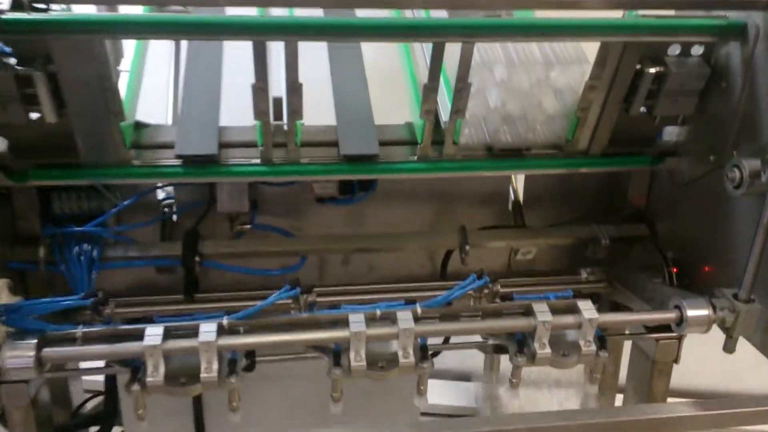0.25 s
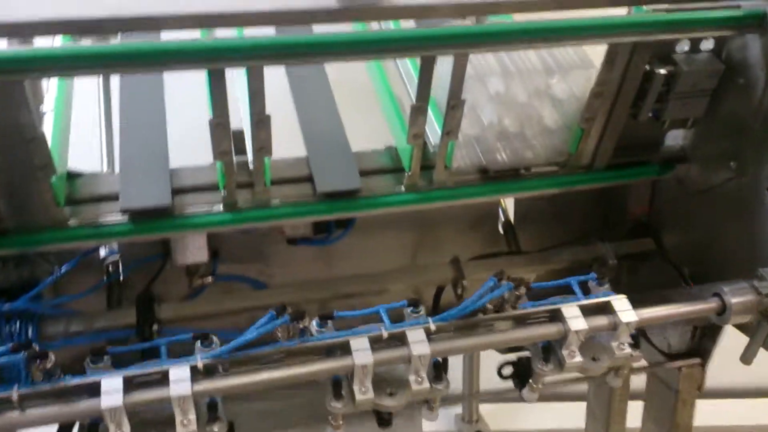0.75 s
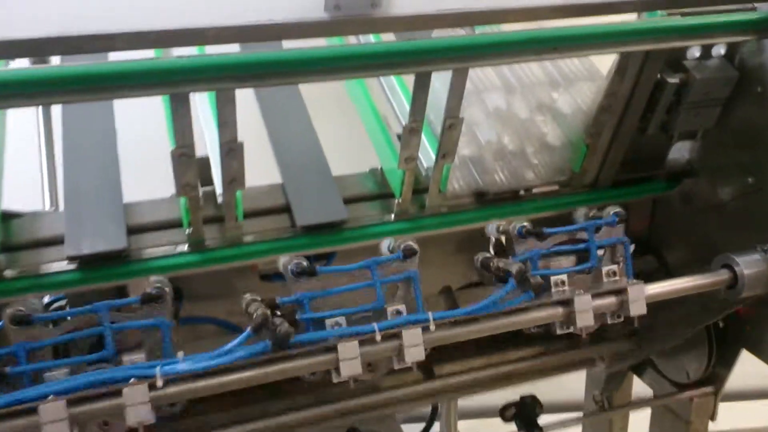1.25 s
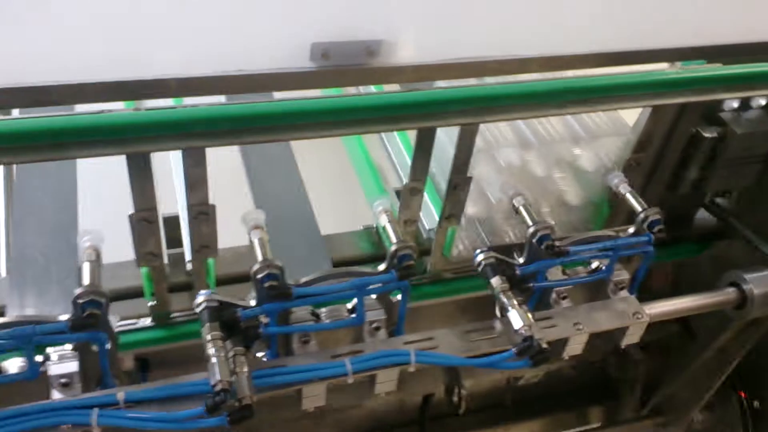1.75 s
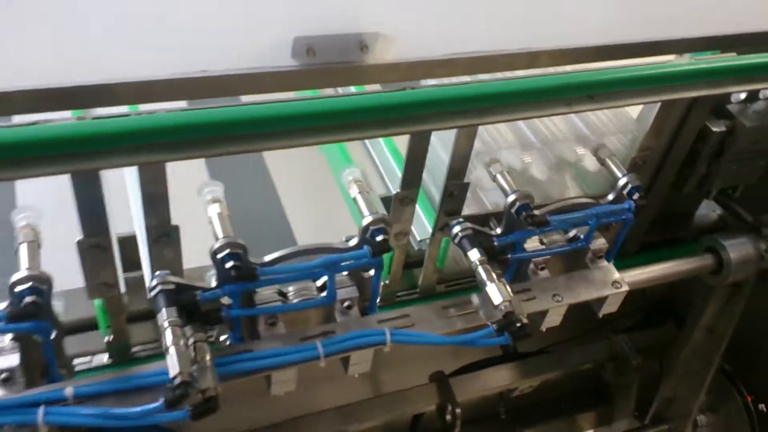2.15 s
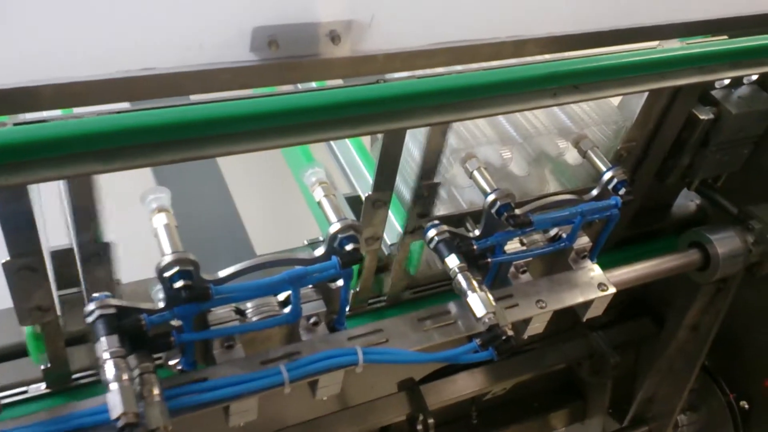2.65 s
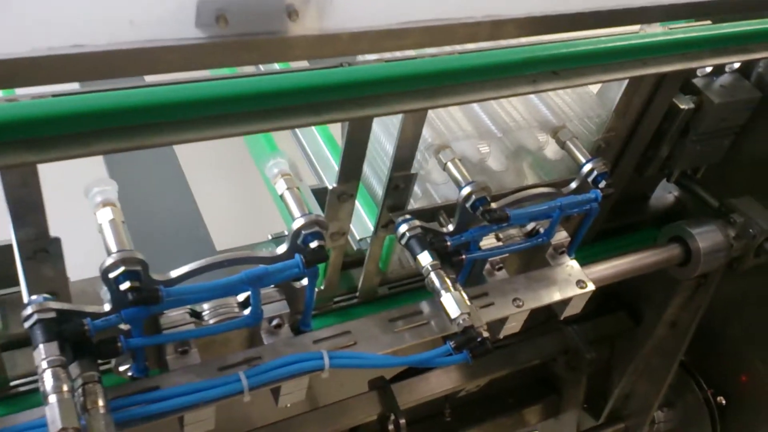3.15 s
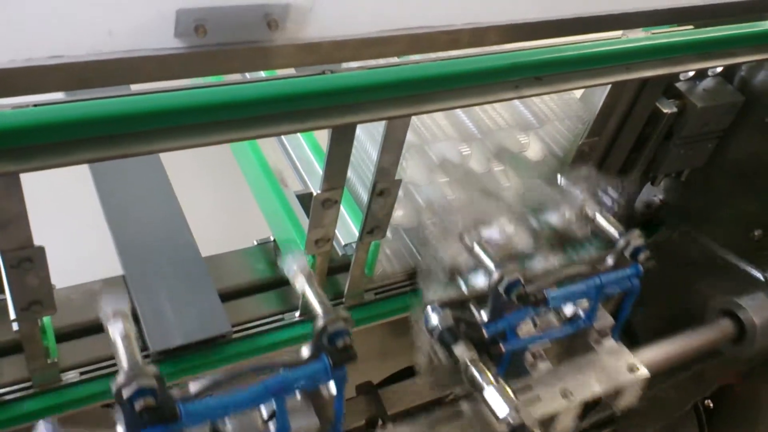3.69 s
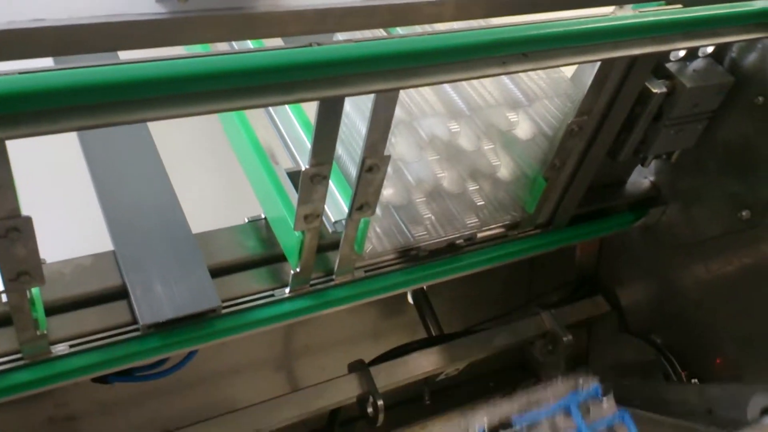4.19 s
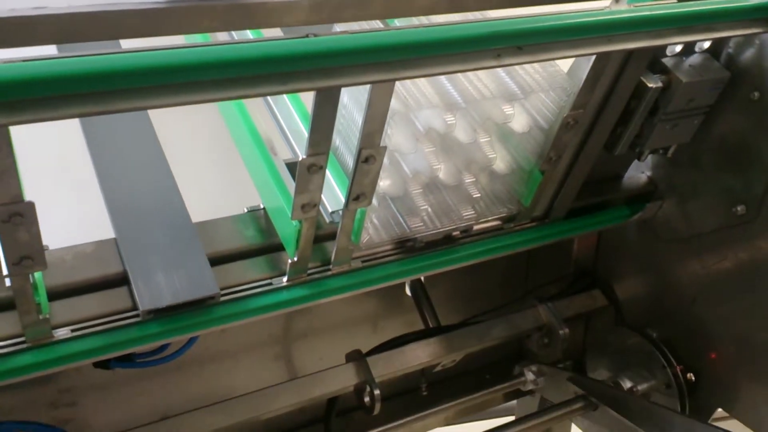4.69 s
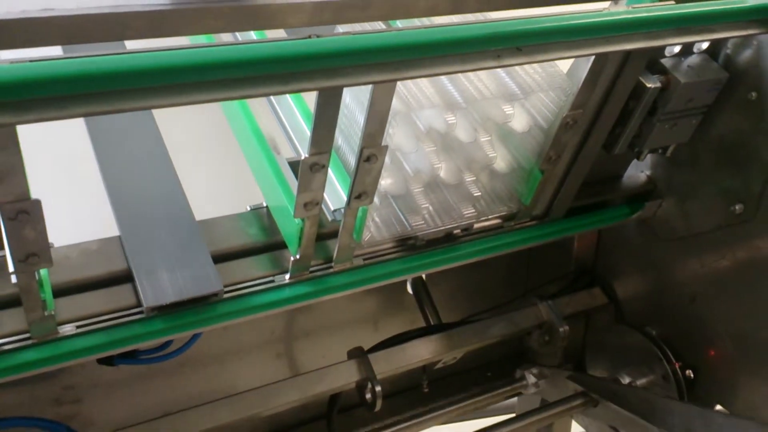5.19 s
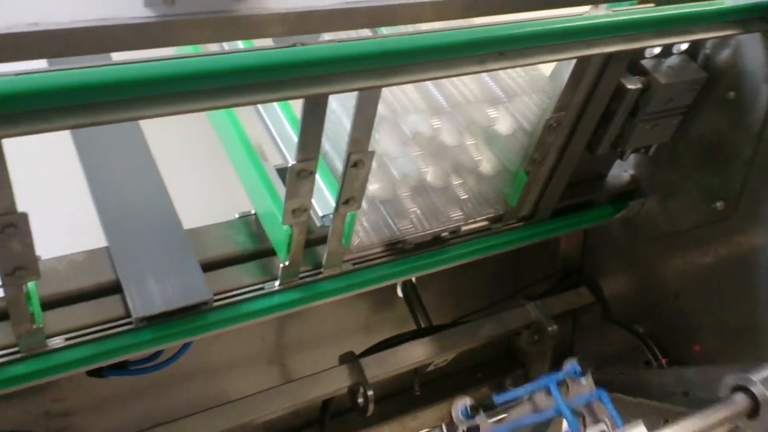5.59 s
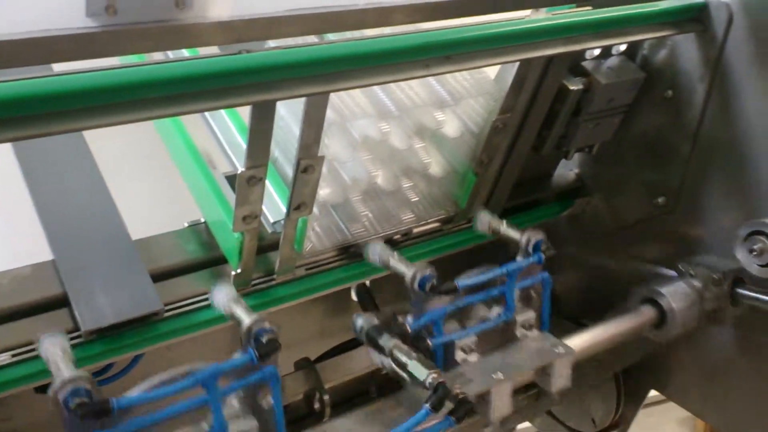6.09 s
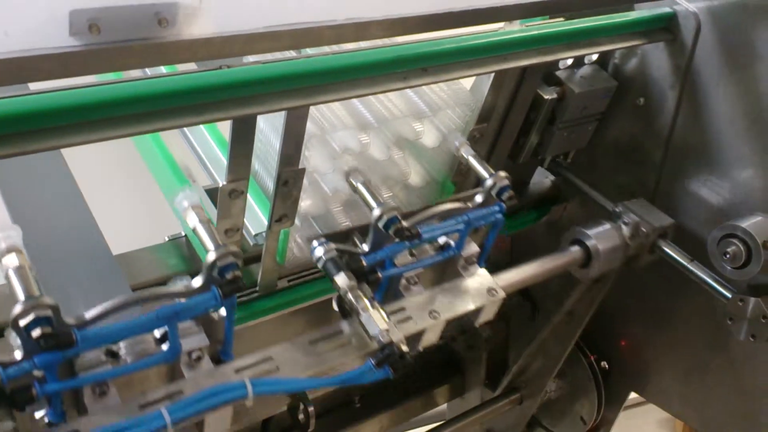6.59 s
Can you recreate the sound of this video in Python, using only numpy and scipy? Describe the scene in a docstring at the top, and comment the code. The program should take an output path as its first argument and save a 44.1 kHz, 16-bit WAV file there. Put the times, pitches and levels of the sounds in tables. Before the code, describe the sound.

A pneumatic arm in a steel machine housing knocks and hisses, with one violent air blast mid-way, long vacuum hiss, then clacks and bright valve ticks.

```python
"""A pneumatic pick-and-place arm works inside the steel housing of a packaging machine.
Turbulent air, as coloured noise, hisses from vacuum ejectors while suction cups hold and puffs from valves.
Noise bursts and decaying modes sound as the arm knocks on its stops, padded blows land and small parts tick.
Echoes of the housing and workshop follow these sounds, over a drive hum, churning gear and a low rumble."""
import sys
import numpy as np
from scipy import signal
from scipy.fft import rfft, irfft, next_fast_len
from scipy.io import wavfile
from scipy.ndimage import uniform_filter1d

SR = 44100
rng = np.random.default_rng(int(sys.argv[2]) if len(sys.argv) > 2 else 0)


def to_wav(s):
    """Save 16-bit WAV."""
    ch = np.atleast_2d(s).T  # columns
    pcm = np.round(np.clip(ch, -1, 1) * 32767)  # PCM
    wavfile.write(sys.argv[1], SR, pcm.astype(np.int16))


N = 301644
TIME = np.arange(N) / SR  # clock of the scene [s]
AGE = TIME[:SR]  # clock of one event, one second long [s]

# spells of suction: (valve opens [s], valve shuts [s], level [dB])
SUCTION_SPELLS = [(-.1, 0.251, -27.5), (2.69, 4.958, -22.5)]
# valve exhausts: (time [s], level [dB], rise [s], t60 [s], low rush [dB])
EXHAUSTS = [(.773, -26, 0.012, 0.43, 0.5), (1.328, -40, 0.013, 0.38, -1), (2.074, -41, 0.022, 0.26, -13),
            (2.674, -4.5, 0.012, 0.17, -16), (2.829, -19, 0.024, 0.1, -2.5),
            (2.973, -14, 0.0043, 0.3, -7.5), (3.078, -11, 0.0019, 0.12, -35),
            (3.419, -25.5, 0.049, 0.18, -4.5), (5.12, -31, 0.0041, 0.34, 5.5),
            (5.225, -40, 0.029, 0.2, 2.5), (5.484, -26.5, 0.0011, 0.17, 4),
            (5.762, -43.5, 0.0027, 0.38, -3), (6.118, -34, 0.0015, 0.44, -1),
            (6.326, -36, 0.0035, 0.26, -3.5), (6.397, -31, 0.0033, 0.21, -2)]
# spectrum of clattering linkages: (frequency [Hz], level [dB])
CLATTER_SPECTRUM = [(150, -36), (400, -20.5), (750, -3.5), (1050, -1), (1400, 0), (1750, -9), (2300, 0),
                    (3300, -7), (6000, -12.5)]
# spectrum of small valves and catches: (frequency [Hz], level [dB])
TICK_SPECTRUM = [(700, -6), (1500, -1.5), (2500, -2), (4300, 11), (7400, 4.5), (10000, 4), (12000, -11),
                 (15500, -5.5)]
# blows that excite the frame: (time [s], level [dB])
FRAME_IMPACTS = [(2.68, -46.5), (2.772, -38.5), (2.843, -33.5), (2.981, -34.5), (3.092, -32)]
# spectrum of the churning gear: (frequency [Hz], level [dB])
CHURN_SPECTRUM = [(140, -2.5), (200, 2), (300, -3), (480, -3.5), (700, -2.5), (1200, -10), (2300, -19.5),
                  (3200, -29)]


def undb(db):
    """Level to amplitude: 20 dB is a factor of ten."""
    return 10 ** (np.asarray(db) / 20)


def unit(x):
    """Normalise mean power: scale to rms 1."""
    return x / np.sqrt(np.mean(x ** 2))


def curve(rows):
    """Linear interpolation in time of each column after the first."""
    s, *columns = np.transpose(rows)
    return [np.interp(TIME, s, c) for c in columns]


def filtered(x, gain_at):
    """Linear filtering: multiply the spectrum by a gain that depends on frequency."""
    size = x.shape[-1]
    length = next_fast_len(size, True)
    f = np.maximum(np.fft.rfftfreq(length, 1 / SR), 1)
    return irfft(rfft(x, length) * gain_at(f), length)[..., :size]


def noise(spectrum, size=N):
    """Coloured Gaussian noise of rms 1, whose spectrum falls away past the ends of its table."""
    hz, db = np.transpose(spectrum)

    def colour(f):
        shape = undb(np.interp(np.log(f), np.log(hz), db))
        return shape / (1 + (hz[0] / f) ** 2 / 2) / (1 + (f / hz[-1] / 2) ** 4)

    return unit(filtered(rng.standard_normal(size), colour))


def resonate(x, hz, q):
    """Second-order resonance: a band of relative width 1/q, scaled to rms 1."""
    return unit(filtered(x, lambda f: 1 / (1 + 1j * q * (f / hz - hz / f))))


def fade(t60, rise):
    """Exponential decay: after a linear rise, amplitude falls 60 dB in t60 seconds."""
    return np.minimum(AGE / rise, 1) * np.exp(-np.log(1000) * np.maximum(AGE - rise, 0) / t60)


def swell(length):
    """Half-sine envelope: a smooth rise and fall."""
    return np.sin(np.pi * np.minimum(AGE / length, 1))


def ring(modes, detune):
    """Modal superposition: each blow lands on another spot and shares its force a little differently."""
    hz, db, t60 = np.transpose(modes)[:, :, None]
    spot, drift, phase = rng.standard_normal((len(modes), 3)).T[:, :, None]
    size = undb(db + spot)
    decay = np.exp(-np.log(1000) * AGE / t60)
    waves = np.sin(2 * np.pi * (hz * (1 + detune * drift) * AGE + phase)) * decay
    return (size * waves).sum(0) / np.sqrt(np.sum(size ** 2) / 2)


def walk(rate):
    """Slow random fluctuation: Gaussian knots at a rate [1/s], joined by straight lines."""
    knots = rng.standard_normal(int(N / SR * rate) + 2)
    return np.interp(TIME * rate, np.arange(len(knots)), knots)


def mix(events):
    """Linear superposition of (start [s], sound) pairs on one track."""
    out = np.zeros(N)
    for s, x in events:
        i = max(int(s * SR), 0)
        out[i:i + len(x)] += x[:N - i]
    return out


def together(*gains):
    """Incoherent addition: unrelated sounds add in power."""
    return np.sqrt(sum(g ** 2 for g in gains))


def aftermath(events, gain_db, t60, rise=.015):
    """Energy decay: a level rises quickly at each (time [s], level [dB]) event, then dies away."""
    return np.sqrt(mix((s, (fade(t60, rise) * undb(db + gain_db)) ** 2) for s, db in events))


def ejectors(flutter_db=1.1, drift_db=-0.63, open_s=.024, shut_s=0.0011, gain_db=-1):
    """Jet turbulence: venturi ejectors hiss for as long as the suction valve is open."""
    # spectrum of the jets: (frequency [Hz], level [dB])
    jet_spectrum = [(400, -19.5), (750, -29), (1100, -17), (1400, -10.5), (1750, -17), (2250, -8.5),
                    (3700, -7.5), (5300, -6.5), (6400, -0.5), (7800, -0.5), (8600, -3.5), (9900, -1),
                    (12000, -8), (15500, -11)]
    flow = 0
    for opens, shuts, db in SUCTION_SPELLS:
        opening = np.clip((TIME - opens) / open_s, 0, 1)
        closing = np.clip((shuts - TIME) / shut_s, 0, 1)
        flow = flow + opening * closing * undb(db)
    # the hiss sinks a little while the arm swings down
    dip_s, dip_width_s, depth_db = 3.95, 0.75, -1.84
    dip_db = depth_db * np.exp(-((TIME - dip_s) / dip_width_s) ** 2)
    flutter = flutter_db * (walk(90) + walk(25))
    return flow * noise(jet_spectrum) * undb(gain_db + dip_db + flutter + drift_db * walk(4.2))


def exhaust(db, rise, t60, rush_db, top_hz=19000, dulling=0.24):
    """Pressure discharge: a cylinder dumps air as a bright jet over a low rush; weak jets are duller."""
    # spectrum of the jet: (frequency [Hz], level [dB])
    puff_spectrum = [(1500, -6), (2200, -6.5), (3400, -2.5), (4200, -4.5), (5500, -3.5), (7800, 0),
                     (10200, -1.5), (12000, -10), (15500, -15.5)]
    # spectrum of the lower rush: (frequency [Hz], level [dB])
    rush_spectrum = [(250, -19.5), (650, -8.5), (1200, -5), (1750, -3.5), (2400, -1.5), (3500, -8.5),
                     (6000, -12), (13000, -42.5)]
    edge_hz = top_hz * undb(dulling * db)
    jet = filtered(noise(puff_spectrum, size=SR), lambda f: 1 / np.hypot(1, (f / edge_hz) ** 3))
    pressure = fade(t60, rise)
    # the piston pushes the last air out after every exhaust
    trail = undb(-20.5) * fade(t60=.3, rise=0.14)
    rush = undb(rush_db) * noise(rush_spectrum, size=SR) * np.hypot(pressure, trail)
    return (jet * pressure + rush) * undb(db)


def rod_slides():
    """Sliding friction: piston rods rub in their seals, heard as swelling noise."""
    # strokes of the rods: (time [s], level [dB], length [s])
    rod_strokes = [(0.37, -56.5, 0.19), (2.087, -58.5, 0.26), (2.252, -49, 0.043)]
    # spectrum of the friction: (frequency [Hz], level [dB])
    friction_spectrum = [(1200, -8), (2100, 5), (2700, 4), (3600, -11), (8000, -24)]
    return mix((s, noise(friction_spectrum, size=SR) * swell(length) * undb(db))
               for s, db, length in rod_strokes)


def cavity(x):
    """Cavity resonance: the hollow of the housing lifts or weakens narrow bands of the air noise."""
    # resonances of the hollow: (frequency [Hz], gain of each alone [dB])
    hollow_modes = [(1041, 3.5), (1431, 7.5), (1568, 1), (2419, -0.5), (2509, -3), (3694, 3.5), (4001, 3),
                    (4849, -9.5), (5638, 7), (6773, 2.5), (6953, -5.5), (7573, 8), (10034, 2), (10645, 6)]
    width_hz = 24

    def gain(f):
        return 1 + sum((undb(db) - 1) / (1 + 2j * (f - hz) / width_hz) for hz, db in hollow_modes)

    return filtered(x, gain)


def air_outlets(count=3):
    """Incoherent sources: several outlets blow together, each with its own turbulence and echoes."""
    out = 0
    for _ in range(count):
        puffs = mix((s, exhaust(*row)) for s, *row in EXHAUSTS)
        air = puffs + rod_slides() + ejectors()
        out = out + housing(air, direct_db=-6.0, wet_db=-1, early_db=1.0, lead_s=.00042)
    return cavity(out) / np.sqrt(count)


def knock(db, treble_db, t60, hz, q=4, body_db=-1, clatter_db=-5, ring_db=-15.5, snap_t60=.027):
    """Impact excitation: a sharp snap, a clatter of linkages round one resonance and a short steel ring."""
    # modes of the steel: (frequency [Hz], level [dB], t60 [s])
    steel_modes = [(1070, -4.5, 0.079), (1302, -5.5, 0.23), (1555, -1, .12), (1880, -5, .13),
                   (2010, -5.5, 0.15), (2490, -13, .12), (2980, -12, .13), (4000, -9, 0.12),
                   (5130, -24, .1)]
    # spectrum of the first snap: (frequency [Hz], level [dB])
    snap_spectrum = [(2000, -23.5), (4000, 6), (7500, 5), (10000, -1), (15000, -18.5)]
    snap = noise(snap_spectrum, size=SR) * fade(snap_t60, 0.0016) * undb(treble_db)
    blow = fade(t60, 0.00068)
    clatter = noise(CLATTER_SPECTRUM, size=SR) * blow
    body = resonate(clatter, hz, q) * np.std(blow)  # lasting ring, weighted by the blow's spread
    steel = ring(steel_modes, detune=0.0073)
    mixed = snap + undb(clatter_db) * clatter + undb(body_db) * body + undb(ring_db) * steel
    return mixed * undb(db)


def stop_knocks():
    """Inelastic rebound: the arm meets a stop, then bounces once with less energy."""
    # steel on steel: (time [s], level [dB], treble [dB], clatter t60 [s], strongest resonance [Hz])
    stop_impacts = [(.229, -24, 0, 0.043, 2250), (0.772, -24.5, -10, 0.025, 1300),
                    (.790, -19, 6.5, 0.06, 1416), (.899, -21.5, 0.5, 0.027, 1400),
                    (1.036, -41.5, -22, 0.044, 2600), (2.144, -38.5, -17.5, 0.018, 1200),
                    (2.299, -31, -16.5, 0.0097, 1950), (2.678, -6.5, -12.5, 0.034, 1527),
                    (2.985, -21, -11, 0.059, 1443), (3.080, -10.5, 4.5, 0.065, 2400),
                    (4.95, -19.5, 0, 0.022, 1480), (5.127, -17, 0.5, 0.099, 1028),
                    (5.496, -14.5, -1.5, 0.035, 1050), (6.19, -35.5, -8, 0.044, 1470)]
    rebound_s, rebound_db = 0.022, -9
    first = mix((s, knock(*row)) for s, *row in stop_impacts)
    second = mix((s + rebound_s, knock(db + rebound_db, *row)) for s, db, *row in stop_impacts)
    return first + second


def thump(db, hz, t60, overtone_db, panel_t60=0.036, boom_db=-3, boom_q=1.82, slap_db=-4):
    """Damped plate modes: a padded blow knocks a panel, with the boom and slap of the parts it shakes."""
    # overtones of the panel: (multiple of the lowest mode [1], level [dB])
    panel_overtones = [(1.198, -20), (1.85, -6), (2.2, -6.5), (2.85, -12), (3.898, -7.5)]
    modes = [(hz, 0, panel_t60)]
    for multiple, mode_db in panel_overtones:
        modes.append((hz * multiple, mode_db + overtone_db, panel_t60))
    panel = ring(modes, detune=0.012) * np.minimum(AGE / 0.00055, 1)
    narrowed = resonate(rng.standard_normal(SR), hz, boom_q)
    boom = resonate(narrowed, hz, boom_q) * undb(boom_db)
    slap = noise(CLATTER_SPECTRUM, size=SR) * undb(slap_db + overtone_db)
    return (panel + (boom + slap) * fade(t60, 0.00018)) * undb(db)


def padded_blows():
    """Superposed impacts: cups and cylinders land with padded blows."""
    # blows: (time [s], level [dB], lowest panel mode [Hz], boom and slap t60 [s], overtones [dB])
    panel_blows = [(.202, -20, 557, 0.099, 0.5), (.226, -27, 400, 0.063, 13), (2.679, -20, 210, 0.051, -13),
                   (2.769, -18.5, 502, 0.059, -12.5), (2.84, -29.5, 346, 0.38, -20),
                   (2.973, -15.5, 408, 0.036, -24.5), (2.988, -15, 325, 0.049, -15),
                   (3.083, -23, 315, 0.24, -20), (4.926, -12, 522, 0.024, 1), (4.94, -23.5, 406, 0.14, 6),
                   (5.13, -34.5, 320, 0.31, 0), (5.51, -32, 292, 0.41, 3.5)]
    return mix((s, thump(*row)) for s, *row in panel_blows)


def valve_ticks():
    """Transient excitation: small valves tick as brief bursts of bright noise."""
    # ticks: (time [s], level [dB])
    tick_times = [(0.897, -37), (0.909, -27.5), (1.345, -59), (1.711, -50), (2.2437, -33), (2.3, -45),
                  (2.973, -14.5), (5.668, -35), (5.765, -55), (6.055, -38.5), (6.1183, -23),
                  (6.1248, -24.5), (6.222, -28.5), (6.325, -21), (6.3989, -21), (6.405, -22.5)]
    return mix((s, noise(TICK_SPECTRUM, size=SR) * fade(t60=.024, rise=0.000444) * undb(db))
               for s, db in tick_times)


def latch_pings():
    """Single resonance: small steel catches snap shut with a short ping of narrow-band noise."""
    # pings: (time [s], level [dB])
    latch_times = [(1.037, -37), (2.116, -39), (5.782, -29), (6.326, -16)]
    return mix((s, resonate(noise(TICK_SPECTRUM, size=SR), hz=4000, q=8.2)
                * fade(t60=0.029, rise=0.00064) * undb(db)) for s, db in latch_times)


def frame_drones():
    """Free vibration: heavy blows set the whole frame droning in its low modes."""
    # modes of the frame: (frequency [Hz], level [dB], t60 before the taper [s])
    frame_modes = [(66, 3, 0.69), (83.8, -1, 0.81), (96.56, 2, 3.1), (153, 1, 0.89), (253, 1, 0.46),
                   (294, -6.5, 0.69)]
    envelope = np.minimum(AGE / 0.019, 1) * (1 - AGE ** 2)  # tapers to nothing in one second
    return mix((s, ring(frame_modes, detune=0.0066) * envelope * undb(db)) for s, db in FRAME_IMPACTS)


def drive():
    """Frequency-modulated tone: the drive hums as the arm swings down; short resonant groans come and go."""
    # hum of the drive: (time [s], pitch [Hz], level [dB])
    hum_track = [(3.4, 258, -68), (3.6, 254, -53), (3.9, 250, -47.5), (4.15, 249, -53.5), (4.5, 247, -55)]
    # low groans: (time [s], level [dB], length [s], pitch [Hz])
    groan_events = [(0, -50, 0.097, 160.7), (.54, -56, 0.14, 156.2), (4.199, -47, 0.23, 400.6),
                    (4.66, -46.5, 0.19, 151.5), (4.762, -47.5, 0.11, 364), (5.27, -54, 0.127, 157),
                    (6.55, -50, 0.079, 189.3), (6.66, -44, 0.052, 167), (6.75, -52, 0.065, 203.4)]
    hz, db = curve(hum_track)
    starting = np.clip((TIME - hum_track[0][0]) / 0.044, 0, 1)
    stopping = np.clip((hum_track[-1][0] - TIME) / 0.017, 0, 1)
    phase = 2 * np.pi * np.cumsum(hz * (1 + 0.0029 * walk(33.5))) / SR
    hum = np.sqrt(2) * np.sin(phase)
    groans = mix((s, resonate(noise(CHURN_SPECTRUM, size=SR), pitch, q=51) * swell(length) * undb(level))
                 for s, level, length, pitch in groan_events)
    return hum * starting * stopping * undb(db + 2.3 * walk(31)) + groans


def machinery(modes_db=-2, wax_db=2.5, leak_onset_s=0.13):
    """Power-summed noise: rumble, gear and seeping air grow with swings and blows; the higher, the wider."""
    # swings of the arm: (starts [s], run-up [s], brakes [s], rumble [dB], churn [dB])
    arm_swings = [(1.58, 0.58, 2.12, -46.5, -55.5), (3.35, 0.078, 4.98, -53.5, -56),
                  (5.5, 0.13, 6.84, -66, -58.5)]
    # cylinders shake the gear as they travel: (time [s], level [dB], length [s])
    cylinder_strokes = [(3.418, -44, 0.15), (5.2, -50.5, 0.21), (5.588, -47, 0.3)]
    # frame resonances that wax and wane as the gear runs: (frequency [Hz], level [dB])
    gear_resonances = [(82, -1.5), (151, -5.5), (199, -10.5), (285, -6.5)]
    # spectrum of the rumble: (frequency [Hz], level [dB])
    rumble_spectrum = [(24, 3), (38, 3), (54, -5), (82, 2.5), (100, -21.5), (120, -15.5), (200, -26.5)]
    # spectrum of the seeping air: (frequency [Hz], level [dB])
    leak_spectrum = [(2000, -9.5), (2500, -7), (3500, -12.5), (5500, -16.5), (7500, -15), (10000, -18.5),
                     (12000, -29), (15500, -38.5)]
    rest_rumble_db, rest_churn_db, rest_leak_db = -54.5, -60, -77.5
    swing_leak_db, brake_s = -67, 0.31  # air seeps past the seals while the arm moves

    swing_rumble, swing_churn, moving = 0, 0, 0
    for starts, run_up, brakes, rumble_db, churn_db in arm_swings:
        braking = np.clip(1 - (TIME - brakes) / brake_s, 0, 1)
        effort = np.clip((TIME - starts) / run_up, 0, 1) ** 2 * braking
        swing_rumble = swing_rumble + effort * undb(rumble_db)
        swing_churn = swing_churn + effort * undb(churn_db)
        moving = moving + np.clip((TIME - starts) / leak_onset_s, 0, 1) * braking

    # after each blow the whole machine heaves and, more briefly, the running gear rattles on
    heave = aftermath(FRAME_IMPACTS, gain_db=-6.5, t60=1.6)
    shake = aftermath(FRAME_IMPACTS, gain_db=-6, t60=0.6)
    # a line bleeds on after its valve has blown or shut
    vents = [(s, db) for s, db, *_ in EXHAUSTS] + [(shuts, db) for _, shuts, db in SUCTION_SPELLS]
    bleed = aftermath(vents, gain_db=-30, t60=2)
    strokes = mix((s, swell(length) * undb(db)) for s, db, length in cylinder_strokes)

    rumble = together(undb(rest_rumble_db), swing_rumble, heave) * undb(2.6 * walk(6.3))
    running = together(undb(rest_churn_db), swing_churn)
    churn = together(running, strokes, shake) * undb(0.61 * walk(15))
    leak = together(undb(rest_leak_db), moving * undb(swing_leak_db), bleed) * undb(.7 * walk(17))

    out = 0
    for hz, db in gear_resonances:
        waxing = undb(db + modes_db + wax_db * walk(5.1))
        out = out + running * resonate(noise(CHURN_SPECTRUM), hz, q=30) * waxing
    layers = [(rumble_spectrum, rumble, .4), (CHURN_SPECTRUM, churn, .5), (leak_spectrum, leak, .9)]
    for spectrum, gain, width in layers:
        mid, side = noise(spectrum), width * noise(spectrum)
        out = out + np.array([mid + side, mid - side]) * gain
    return out


def bumps():
    """Incoherent pressure swells: dull bumps in the deep bass, unrelated at the two ports."""
    # bumps: (time [s], level [dB])
    bump_times = [(0.202, -42), (0.631, -43.5), (2.639, -40.5), (3.06, -41.5), (5.35, -46)]
    # spectrum of a bump: (frequency [Hz], level [dB])
    bump_spectrum = [(25, -0.5), (45, -1.5), (75, -10.5), (130, -31)]

    def port():
        return mix((s, noise(bump_spectrum, size=SR) * swell(length=0.12) * undb(db))
                   for s, db in bump_times)

    return np.array([port(), port()])


def housing(x, direct_db, wet_db, early_db, lead_s, early_t60=0.038, wide_hz=700, order=140):
    """Reverberation: direct sound reaches the left port first; steel-wall echoes and a workshop tail follow."""
    # decay of the housing and workshop: (frequency [Hz], t60 [s], echo level [dB])
    room_decay = [(150, 0.95, -13.5), (530, 0.38, 0.5), (1510, 0.64, -7), (3680, 0.38, -2.5),
                  (7900, 0.27, -5), (14000, 0.089, -8.5)]
    room_hz, room_t60, room_db = np.transpose(room_decay)
    mid, side = rng.standard_normal((2, SR))
    # bass reaches both ports alike, treble is unrelated
    side = filtered(side, lambda f: f / np.hypot(f, wide_hz))
    field = np.array([mid + side, mid - side]) / np.sqrt(2 * SR)
    # bare steel reflects all pitches evenly: flatten the smoothed spectrum
    walls = rfft(field[:, ::-1] * fade(early_t60, .0015))
    power = uniform_filter1d(abs(walls) ** 2, order, axis=1)
    walls = irfft(walls / np.sqrt(power), SR) * (AGE < 2 * early_t60)
    response = undb(early_db) * walls
    # each row of the identity matrix selects one overlapping band
    for share, t60, db in zip(np.eye(len(room_decay)), room_t60, room_db):
        band = filtered(field, lambda f: np.interp(np.log(f), np.log(room_hz), share))
        response = response + band * unit(fade(t60, 0.011)) * undb(db)
    delayed = np.pad(x, (int(lead_s * SR), 0))[:N]
    direct = np.array([x, delayed])
    echoes = signal.fftconvolve(response, x[None], axes=1)[:, :N]
    return undb(direct_db) * direct + undb(wet_db) * echoes


def scene():
    """Direct-to-reverberant ratio: air and knocks lie deep in the housing; thumps, ticks, latches are nearer."""
    knocks = housing(stop_knocks(), direct_db=-4.5, wet_db=-4.0, early_db=1.4, lead_s=.00008)
    thumps = housing(padded_blows(), direct_db=-1, wet_db=-5, early_db=0, lead_s=.00008)
    ticks = housing(valve_ticks(), direct_db=-0.5, wet_db=-4.0, early_db=-0.5, lead_s=.00012)
    latches = housing(latch_pings(), direct_db=0, wet_db=-11, early_db=-5, lead_s=.00012)
    struck = knocks + thumps + ticks + latches + frame_drones()
    return air_outlets() + struck + drive() + machinery() + bumps()


def record(dry):
    """Transduction: each port colours the sound; soft saturation rounds loud peaks and a low-pass cuts the top."""
    # the two microphone ports: (frequency [Hz], left minus right [dB])
    port_balance = [(60, -5), (400, -3), (750, -1.5), (1200, -5), (2200, -7.5), (4000, -4.5), (8000, -4),
                    (11500, 5), (15000, -2.5)]
    hz, db = np.transpose(port_balance)

    def port_gain(f):
        difference_db = np.interp(np.log(f), np.log(hz), db)
        return undb(np.outer([1, -1], difference_db) / 2)

    heard = filtered(dry, port_gain)
    ceiling, top_hz = 5.4, 15750
    rounded = ceiling * np.tanh(heard / ceiling)
    low_pass = signal.ellip(10, .2, 70, top_hz, fs=SR, output="sos")
    return signal.sosfilt(low_pass, rounded)


dry = scene()
out = record(dry)
to_wav(out)
```